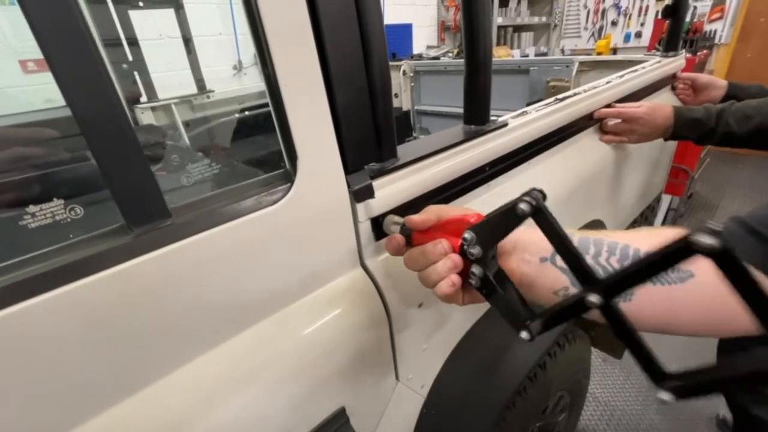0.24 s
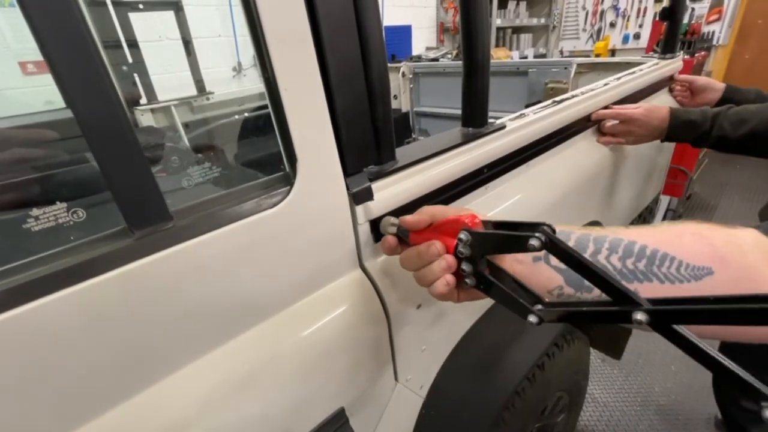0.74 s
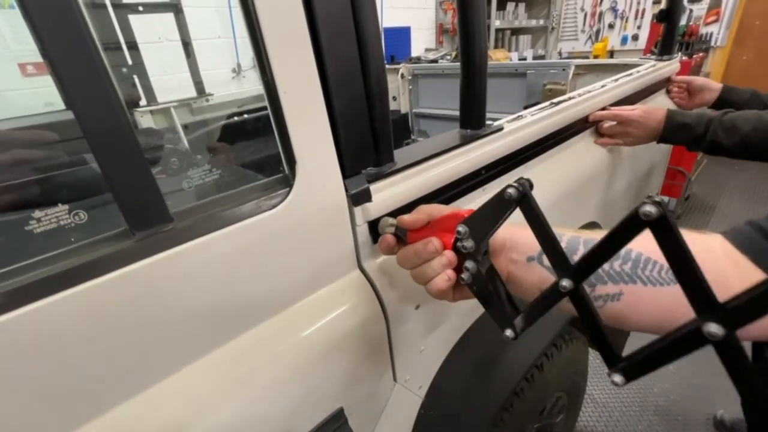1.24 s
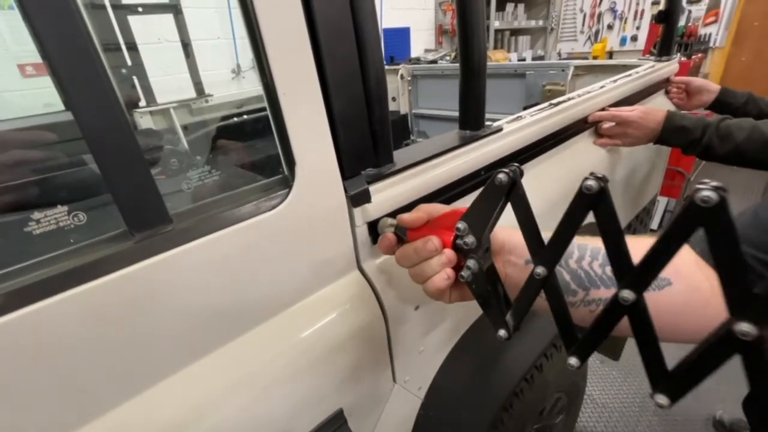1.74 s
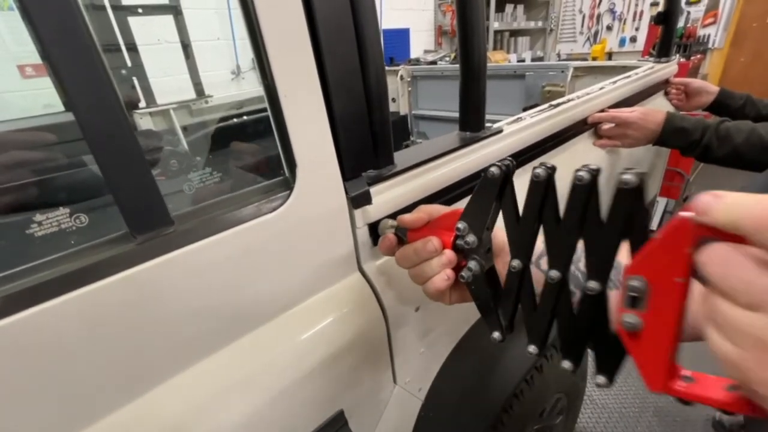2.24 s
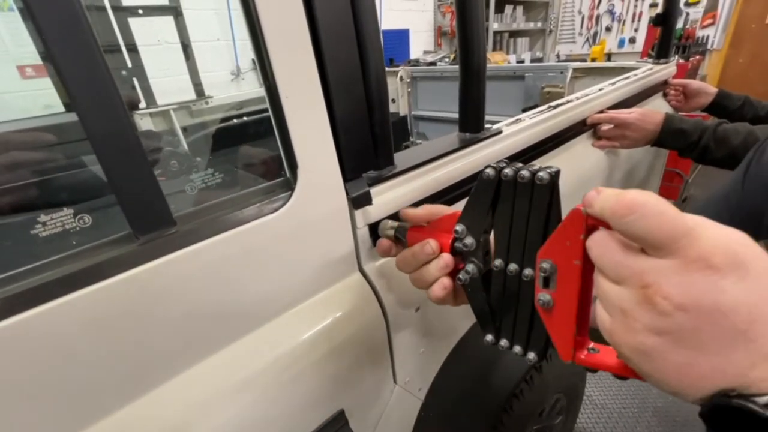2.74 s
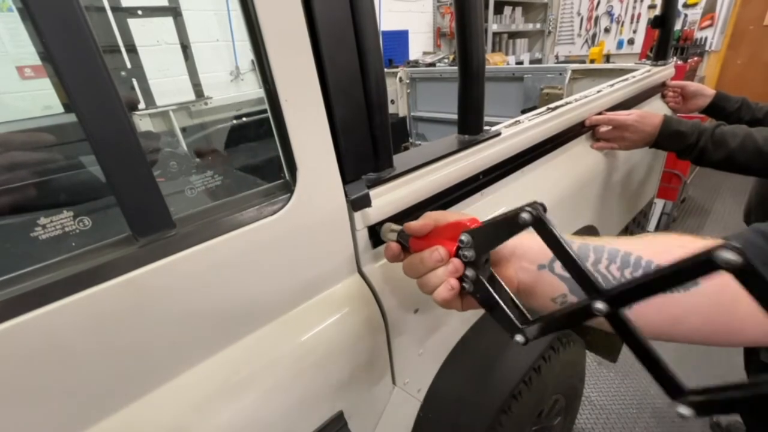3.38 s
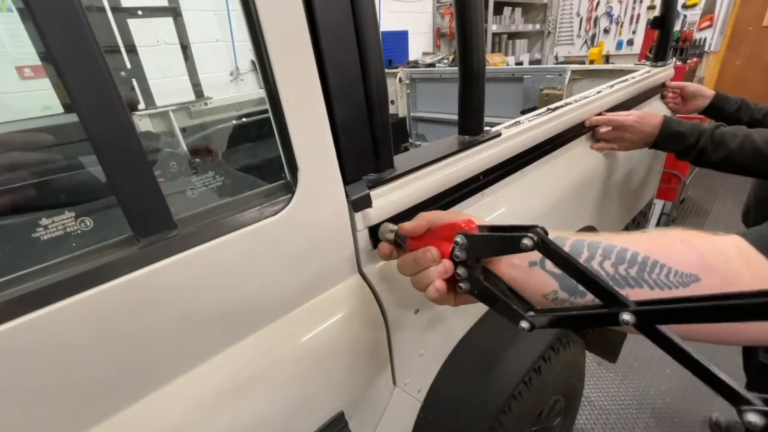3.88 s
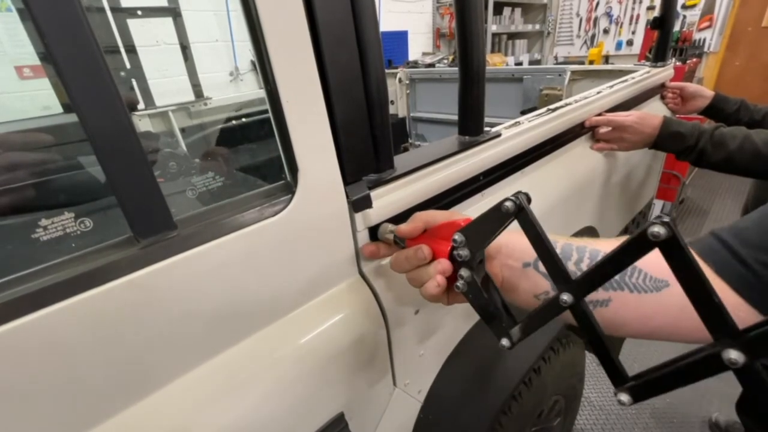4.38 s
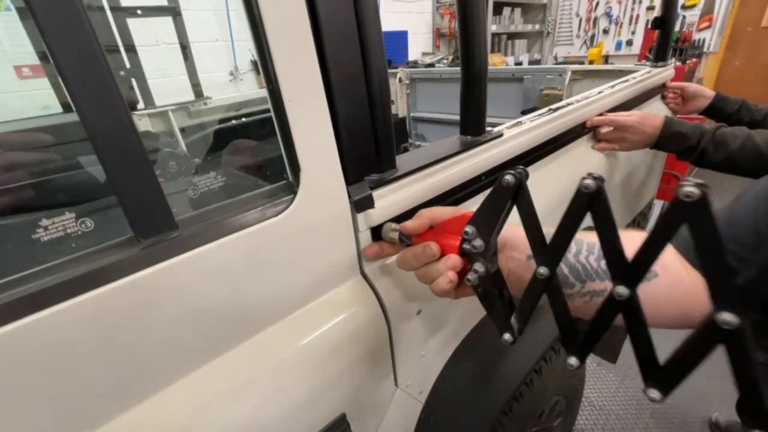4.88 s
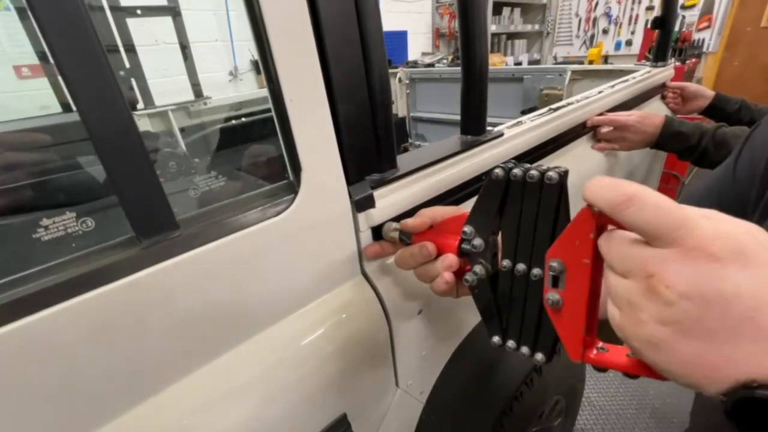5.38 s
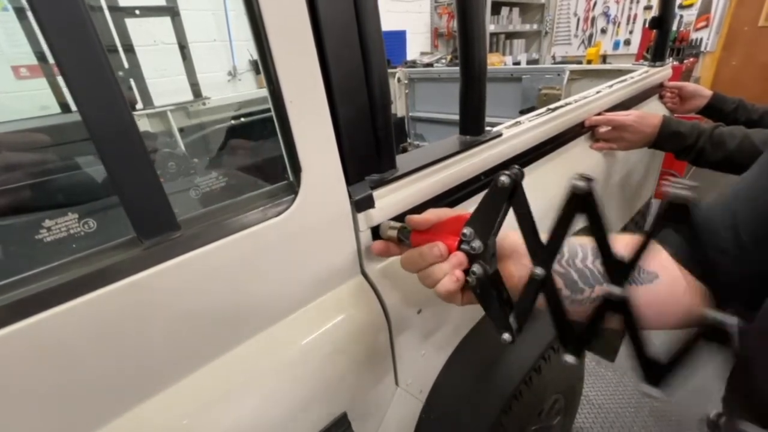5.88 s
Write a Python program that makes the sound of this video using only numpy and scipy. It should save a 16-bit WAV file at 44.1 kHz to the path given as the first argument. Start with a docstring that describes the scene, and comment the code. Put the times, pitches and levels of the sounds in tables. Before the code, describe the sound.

Loose metal arms clatter open and shut in a workshop, straining in short rasping judders against sheet metal before one sharp, booming snap.

```python
"""Lazy-tongs rivet gun on a van panel

A lazy-tongs rivet gun is pumped twice against a van's side panel in a workshop with ventilation.
Each push drags the rivet stem in jerks: trains of slips that shake the sheet and its damped modes.
The steel links clack as filtered noise bursts and ringing sines, rub with a grainy hiss, and rattle.
The stem snaps with a bang; a limiter ducks and climbs back steadily, so the room tail hangs on."""
import sys
import numpy as np
from scipy import signal
from scipy.fft import rfft, irfft
from scipy.io import wavfile
from scipy.ndimage import uniform_filter1d, minimum_filter1d

SR = 44100
rng = np.random.default_rng(int(sys.argv[2]) if len(sys.argv) > 2 else 0)


def generate_wav(signal):
    """Clip the signal to [-1, 1] and save it as 16-bit WAV at the path in sys.argv[1]."""
    frames = np.transpose(np.atleast_2d(signal))
    scaled = np.clip(frames, -1, 1) * 32767
    pcm = np.round(scaled).astype(np.int16)
    wavfile.write(sys.argv[1], SR, pcm)


N = 269884  # length of the scene in samples


def from_db(db):
    """Decibels to gain."""
    return 10 ** (np.asarray(db) / 20)


def unit(x):
    """Scale to unit energy per channel."""
    return x / np.sqrt(np.mean(np.sum(x ** 2, axis=-1)) + 1e-20)


def at_hz(points, hz, axis=1):
    """Read a column of a table on a log-frequency axis."""
    table = np.array(points, float)
    return np.interp(np.log(np.maximum(hz, 1)), np.log(table[:, 0]), table[:, axis])


def seconds(length):
    """A time axis."""
    return np.arange(int(length * SR)) / SR


def add(out, s, sound):
    """Mix a sound in at a given time."""
    start = max(int(s * SR), 0)
    part = sound[..., :N - start]
    out[..., start:start + part.shape[-1]] += part


def through(x, response):
    """Pass a signal through an impulse response."""
    return signal.fftconvolve(np.atleast_2d(x), np.atleast_2d(response), axes=-1)[:, :N]


def band_pass(order, low_hz, high_hz):
    """Filter sections that keep one band."""
    return signal.butter(order, [low_hz, high_hz], "band", fs=SR, output="sos")


def colour(points, size=8192):
    """Causal (minimum-phase) response of a spectrum, unit energy."""
    log_gain = np.log(from_db(at_hz(points, np.fft.rfftfreq(size, 1 / SR))))
    cepstrum = irfft(log_gain)
    # fold the cepstrum onto positive time, which makes the phase minimal
    cepstrum[1:size // 2] *= 2
    cepstrum[size // 2 + 1:] = 0
    return unit(irfft(np.exp(rfft(cepstrum))))


# left-right likeness of diffuse sound: pitch_hz [Hz], likeness [correlation, -1 to 1]
STEREO_LIKENESS = [(60,0.68),(130,.92),(250,.7),(500,0.3),(950,-0.29),(2500,-0.17),(10000,-0.067)]


def diffuse(size):
    """White stereo noise, alike in the bass and nearly unrelated or slightly opposed higher up."""
    mid, side = rfft(rng.standard_normal((2, size)))
    alike = np.clip(at_hz(STEREO_LIKENESS, np.fft.rfftfreq(size, 1 / SR)), -.99, .99)
    shared = np.sqrt((1 + alike) / 2) * mid
    opposed = np.sqrt((1 - alike) / 2) * side
    return irfft(shared + opposed * [[1], [-1]], size)


def burst(t60):
    """The dense, quickly dying vibration after one contact."""
    t = seconds(t60 + .005)
    return unit(diffuse(len(t)) * from_db(-60 * t / t60))


def modes(table, scatter_db, lead_ms):
    """Damped sines, struck with new strengths each time and reaching the left port first."""
    t = seconds(1)
    hz, db, t60 = np.transpose(table)[:, :, None]
    strength = from_db(db + scatter_db * rng.standard_normal(db.shape))
    decay = np.exp(-np.log(1000) * t / t60)
    polarity = (-1) ** np.arange(len(hz))[:, None]
    wave = np.sum(strength * decay * np.sin(2 * np.pi * hz * t) * polarity, axis=0)
    right = np.interp(t - lead_ms / 1000, t, wave, left=0)
    return unit(np.array([wave, right]))


def sharp(t60, spread):
    """A close crack, its rise softened over about 1 ms: alike at both ports, left two samples sooner."""
    crack = burst(t60)[0]
    direct = np.array([np.append(crack, [0, 0]), np.append([0, 0], crack)])
    rise = 1 - np.exp(-np.arange(len(crack)) / (SR * .0008))
    return unit((direct[:, :len(crack)] + spread * burst(t60)) * rise)


LOW_PASS_HZ = 9437


def dull(x):
    """Steep low-pass near 9.4 kHz for the rub, buzz, room and air."""
    return signal.sosfilt(signal.cheby1(10, .5, LOW_PASS_HZ, fs=SR, output="sos"), x)


# colour of the ventilation: pitch_hz [Hz], relative level_db [dB]
AIR_COLOUR = [(15, -36.5), (25, -15.5), (59, -1.5), (80, -10.5), (145, -7), (180, -15), (223, -12.5),
              (277, -21.5), (405, -18.5), (754, -29.5), (1130, -25.5), (5000, -40.5), (8830, -36.5),
              (16000, -66.5)]


def ventilation(level_db):
    """Steady air noise, coloured by its spectrum."""
    return from_db(level_db) * through(diffuse(N), colour(AIR_COLOUR))


# workshop tail: pitch_hz [Hz], t60_s [s], relative reflected level_db [dB]
ROOM_BANDS = [(60,0.92,-9),(200,0.47,-13.5),(486,0.43,-5.5),(1171,0.54,-8.5),(3100,0.69,-7),(6500,0.6,-11),(8740,0.5,-12),(10686,0.82,-1.5),(14000,.2,-25.5)]


def workshop(x, early_db, early_t60, late_db):
    """Quick reflections off the van and floor, then a diffuse tail that dies band by band."""
    t = seconds(1.3)
    white, tail = [diffuse(len(t)), diffuse(len(t))], 0
    edges = np.append(np.geomspace(40, 6500, 14), [8200, 10000, 12000, 16000])
    for k, (low, high) in enumerate(zip(edges, edges[1:])):
        band = signal.sosfilt(band_pass(4, low, high), white[k % 2])  # neighbours use separate noise
        hz = np.sqrt(low * high)
        late = unit(from_db(-60 * t / at_hz(ROOM_BANDS, hz)) * (1 - np.exp(-t / 0.0092)))
        early = unit(from_db(-60 * t / early_t60) * (t > .003))
        envelope = np.hypot(from_db(late_db) * late, from_db(early_db) * early)
        tail = tail + band * from_db(at_hz(ROOM_BANDS, hz, axis=2)) * envelope
    return through(x, tail)


# modes of the hollow van body: pitch_hz [Hz], relative level_db [dB], t60_s [s]
VAN_MODES = [(49.3,-5,0.59),(56.98,-4,1.2),(75,-0.5,0.72),(90.33,-7.5,0.87),(119.6,-3.5,0.59),(149,-5,0.69)]
# a clack shoves the van in step with its strength: dB per dB of steel and of tool body
BOOM_PER_STEEL, BOOM_PER_BODY = .45, 0.38


def van_boom(clack_db, jerk_db, snap_db, swell_s, rumble_db):
    """Every shove swells slowly into the low modes of the hollow van and the rumble of its panels."""
    shoves = []
    for s, crack_db, knock_db, _ in CLACK_EVENTS:
        shoves.append((s, BOOM_PER_STEEL * crack_db + BOOM_PER_BODY * knock_db + clack_db))
    shoves += [(s, db + jerk_db) for s, db, _ in JERK_EVENTS]
    shoves += [(SNAP_S, snap_db)]
    out, t = np.zeros((2, N)), seconds(1)
    bass = band_pass(2, 48, 130)
    for s, db in shoves:
        rumble = unit(signal.sosfilt(bass, diffuse(len(t))) * from_db(-60 * t / 0.72))
        boom = modes(VAN_MODES, scatter_db=5.0, lead_ms=.2) + from_db(rumble_db) * rumble
        add(out, s, from_db(db) * unit(boom * (1 - np.exp(-t / swell_s))))
    return out


# crack of the steel: pitch_hz [Hz], relative level_db [dB]
STEEL_COLOUR = [(300,-37.5),(1300,-12.5),(2100,-8),(3000,-10),(4300,-7),(5400,-4.5),(6600,-4.5),(7800,-6.5),(9400,-5),(10700,-5.5),(12200,-3.5),(13500,-36),(15500,-36),(17000,-50.5)]
# ring of the steel links: pitch_hz [Hz], relative level_db [dB], t60_s [s]
LINK_MODES = [(2080,-3.5,.12),(2250,-5,0.25),(3852,1,0.03),(5890,-6,0.1),(6070,-12.5,.1)]


def steel(contacts, ring_db):
    """Contacts on the tongs: a bright crack and a faint ring of the links."""
    crack = through(contacts, colour(STEEL_COLOUR))
    ring = through(contacts, modes(LINK_MODES, scatter_db=-1.5, lead_ms=0.13))
    return crack + from_db(ring_db) * ring


# colour of the tool's cast body: pitch_hz [Hz], relative level_db [dB]
TOOL_COLOUR = [(60,-15),(150,-1.5),(300,2.5),(450,-5),(750,-5.5),(1020,-6),(1200,-13),(1550,-12.5),(2300,-9.5),(6000,-24.5)]


def tool_body(x):
    """The cast body colours whatever shakes it."""
    return through(x, colour(TOOL_COLOUR))


def buzz(jerk_db, snap_db, t60):
    """Each jolt leaves the loose links buzzing: decaying noise in the colour of the steel."""
    out = np.zeros((2, N))
    jolts = [(s, db + jerk_db) for s, db, _ in JERK_EVENTS] + [(SNAP_S, snap_db)]
    for s, db in jolts:
        add(out, s, from_db(db) * burst(t60))
    return dull(through(out, colour(STEEL_COLOUR)))


# a stroke swells, eases off while it lasts, then dies away
STROKE_ATTACK_S, STROKE_SAG_DB_PER_S, STROKE_RELEASE_DB_PER_S = 0.021, 8, 75


def stroke(start, length):
    """Gain of one slide of the tongs over time: attack, slow sag, release."""
    t = np.maximum(np.arange(N) / SR - start, 0)
    fall_db = STROKE_SAG_DB_PER_S * t + STROKE_RELEASE_DB_PER_S * np.maximum(t - length, 0)
    return (1 - np.exp(-t / STROKE_ATTACK_S)) * from_db(-np.minimum(fall_db, 100))


# the tongs slide open or shut: start_s [s], length_s [s], relative hiss_db [dB], low groan_db [dB]
STROKE_EVENTS = [(0, 0.08, -56.5, -45), (.9, 0.67, -72, -66.5), (2.879, .32, -68, -56.5),
                 (3.799, 0.27, -72.5, -55), (5.061, .13, -72, -65.5), (5.71, .41, -67.5, -51.5)]


def rub(hiss_db, groan_db, grain_db):
    """Dry pivots slide with an uneven grain: a hiss from the steel, a groan from the tool's body."""
    hiss = sum(from_db(db + hiss_db) * stroke(s, length) for s, length, db, _ in STROKE_EVENTS)
    groan = sum(from_db(db + groan_db) * stroke(s, length) for s, length, _, db in STROKE_EVENTS)
    t = np.arange(N) / SR
    steps = np.arange(0, N / SR, .004)
    grain = np.interp(t, steps, rng.standard_normal(len(steps)))
    friction = dull(diffuse(N)) * from_db(grain_db * grain)
    return steel(friction * hiss, ring_db=-6.0) + tool_body(friction * groan)


# rattle levels: offsets over the stroke's hiss and groan, and random spread either way
RATTLE_STEEL_DB, RATTLE_BODY_DB, RATTLE_SPREAD_DB = 17, -1.5, 4.5
RATTLES_PER_S, RATTLE_TOP_HZ = 11, 1500  # mean rate, top of the knock


def rattles():
    """Light random contacts of the loose pivots during each stroke, as rows like those of the clacks."""
    rows = []
    for start, length, hiss_db, groan_db in STROKE_EVENTS:
        draws = rng.random((24, 2))
        times = np.cumsum(.4 + 1.2 * draws[:, 0]) / RATTLES_PER_S
        levels_db = RATTLE_SPREAD_DB * (2 * draws[:, 1] - 1) - STROKE_SAG_DB_PER_S * times
        for after, db in zip(times, levels_db):
            if after < length:
                crack_db = hiss_db + RATTLE_STEEL_DB + db
                knock_db = groan_db + RATTLE_BODY_DB + db
                rows.append((start + after, crack_db, knock_db, RATTLE_TOP_HZ))
    return rows


# handle knocks as the slack is taken up: start_s [s], relative level_db [dB]
KNOCK_EVENTS = [(0.064,-46),(5.618,-45),(5.702,-27),(5.707,-20),(5.933,-39)]
# dull colour of the handle: pitch_hz [Hz], relative level_db [dB]
HANDLE_COLOUR = [(80,-11),(200,7.5),(400,-6),(720,-0.5),(1300,-3.5),(1700,-3.5),(2300,-4.5),(3500,-14.5),(6000,-24),(10000,-29),(14000,-60)]


def handle(knock_db, ring_db):
    """A dull knock at the handle, with the links singing on."""
    contacts = np.zeros((2, N))
    for s, db in KNOCK_EVENTS:
        add(contacts, s, from_db(db + knock_db) * burst(t60=0.029))
    ring = through(contacts, modes(LINK_MODES[:2], scatter_db=-0.5, lead_ms=0.067))
    return through(contacts, colour(HANDLE_COLOUR)) + from_db(ring_db) * ring


# short, bright ping of a pivot pin: pitch_hz [Hz], relative level_db [dB], t60_s [s]
PIN_MODES = [(3430,-4.5,0.0056),(5570,-14.5,0.033),(7370,-1.5,0.0049),(9070,6.5,0.017),(9240,-9,0.0095),(11200,-1.5,0.029)]


def pings(ping_db):
    """The struck pin rings for a few milliseconds, right next to the microphone."""
    out = np.zeros((2, N))
    for s, crack_db, *_ in CLACK_EVENTS:
        add(out, s, from_db(crack_db + ping_db) * modes(PIN_MODES, scatter_db=2.0, lead_ms=0.039))
    return out


# the links hit their stops or each other; the first row, at 0.085 s, is a dull knock at the handle: # start_s
# [s], relative steel_db [dB], relative body_db [dB], top of the knock top_hz [Hz]
CLACK_EVENTS = [(.085, -54.5, -37.5, 593), (.197, -47, -63, 1500), (.301, -27.5, -47, 1470),
                (0.7109, -39.5, -50, 2350), (.7566, -26.5, -48, 2010), (.83, -17.5, -39, 1853),
                (1.835, -60.5, -64.5, 1500), (2.351, -17, -35, 1147), (2.4455, -17, -29.5, 960),
                (2.5677, -7, -21, 1660), (2.894, -43.5, -47, 1190), (2.97, -46.5, -49.5, 1210),
                (3.064, -40, -44.5, 1420), (3.107, -33, -48, 2050), (3.159, -30, -54, 2500),
                (3.996, -18, -33.5, 2317), (4.34, -52.5, -74, 2010), (5.1955, -17.5, -42.5, 1110),
                (5.22, -15, -39.5, 1092), (5.2382, -9.5, -32.5, 1910), (5.929, -38.5, -49.5, 1900),
                (6.046, -42, -67, 2000)]
KNOCK_LOW_HZ = 380  # the small head radiates little below this


def clacks(steel_db, body_db, ring_db, arm_db):
    """Link on link: steel cracks, the cast head knocks, and the arms ring on just under the knock's top."""
    contacts, knocks = np.zeros((2, 2, N))
    for s, crack_db, knock_db, top_hz in list(CLACK_EVENTS) + rattles():
        add(contacts, s - .0005, from_db(crack_db + steel_db) * sharp(t60=0.013, spread=1.0))
        low_pass = signal.butter(4, top_hz, fs=SR, output="sos")
        knock = signal.sosfilt(low_pass, burst(t60=0.12))
        arms = signal.sosfilt(band_pass(3, 0.6 * top_hz, 0.83 * top_hz), burst(t60=0.24))
        add(knocks, s + .0035, from_db(knock_db + body_db) * knock)
        add(knocks, s + .0035, from_db(knock_db + body_db + arm_db) * arms)
    knocks = signal.sosfilt(signal.butter(1, KNOCK_LOW_HZ, "high", fs=SR, output="sos"), knocks)
    return steel(contacts, ring_db) + tool_body(knocks)


# modes of the van's side panel: pitch_hz [Hz], relative level_db [dB], t60_s [s]
PANEL_MODES = [(162.2,-15,0.98),(239.7,-10.5,0.86),(269.5,-6,0.36),(354,-13,.1),(403.5,-13,0.24),(426,-12.5,0.13),(490,-10,0.085),(557,-5.5,0.35),(602,-6.5,0.17),(701,0,.09),(855,-4.5,0.023),(939,10.5,0.044),(990,-6.5,0.21),(994,-7.5,.1),(1306,-8,0.25),(1392,-6,.07),(1597,-19,0.38),(2170,-13.5,0.065)]


def panel():
    """One blow's ring of the side panel."""
    return modes(PANEL_MODES, scatter_db=1.5, lead_ms=.25)


# the stem jerks through the rivet, harder as each push goes on:
# start_s [s], relative level_db [dB], fading time of the judder length_s [s]
JERK_EVENTS = [(.296, -37.5, 0.019), (.324, -32, 0.013), (.359, -19.5, 0.017), (.367, -16, 0.019),
               (.403, -7.5, 0.008), (3.354, -34.5, .008), (3.375, -26.5, .014), (3.423, -18, .017),
               (3.436, -12, .014), (3.453, -9, .028), (3.476, -7, .006)]
# colour of the shaken sheet metal: pitch_hz [Hz], relative level_db [dB]
SHEET_COLOUR = [(50,-30.5),(150,-10),(270,0.5),(550,-7.5),(760,-10),(950,-4),(1150,-10.5),(2200,-16),(4000,-22),(10000,-44.5),(14000,-73.5)]
JERK_BITE = 1.315  # harder jerks are brighter: dB of steel per dB of jerk


def jerks(steel_db, sheet_db, modes_db, slips_per_s, ring_db):
    """Each jerk is a run of uneven slips of the stem that set the sheet metal ringing."""
    contacts, sheet, ringing = np.zeros((3, 2, N))
    for s, panel_db, length in JERK_EVENTS:
        t = seconds(2 * length)
        slips = (rng.random(len(t)) < slips_per_s / SR) * rng.standard_normal(len(t))
        slips[0] = 2  # the stem always lets go at the start
        slips = unit(slips * np.exp(-t / length))
        crack = unit(through(slips, sharp(t60=.012, spread=0.67)))
        add(contacts, s, from_db(JERK_BITE * panel_db + steel_db) * crack)
        add(sheet, s, from_db(panel_db + sheet_db) * unit(through(slips, burst(t60=0.082))))
        add(ringing, s, from_db(panel_db + modes_db) * unit(through(slips, panel())))
    return steel(contacts, ring_db) + through(sheet, colour(SHEET_COLOUR)) + ringing


# the stem sticks and slips almost evenly: slips per second and their unevenness (share of a period)
SQUEAL_HZ, SQUEAL_JITTER = 937.5, .12
SQUEAL_BITE = 1.7  # dB of squeal per dB of jerk, so hard jerks squeal most


def squeal(squeal_db, swell_s):
    """Under load the slips fall into step and make the rivet squeal for a moment."""
    slips = np.zeros(N)
    for s, db, length in JERK_EVENTS:
        after = np.cumsum(1 + SQUEAL_JITTER * rng.standard_normal(60)) / SQUEAL_HZ
        sizes = unit((1 - np.exp(-after / swell_s)) * np.exp(-(after / length) ** 2))
        slips[((s + after) * SR).astype(int)] += from_db(SQUEAL_BITE * db + squeal_db) * sizes
    return signal.sosfilt(band_pass(2, 600, 1250), slips + 1e-18) * np.ones((2, 1))


# colour of the bang: pitch_hz [Hz], relative level_db [dB]
SNAP_COLOUR = [(40,-66.5),(100,-2),(250,-8),(450,-12.5),(700,-5.5),(980,-1),(1700,0.5),(2800,-3.5),(4500,-5),(5700,2),(7000,-1),(9600,-5),(11500,-11.5),(14000,-65.5)]
# ring of the breaking stem: pitch_hz [Hz], relative level_db [dB], t60_s [s]
STEM_MODES = [(3540,-12.5,0.005),(5660,0.5,0.0086),(8740,-0.5,0.0099)]
# the panel's single damped flex: pitch_hz [Hz], relative level_db [dB], t60_s [s]
FLEX_MODES = [(165,-3,0.1),(276,3,0.039),(514,5,0.01),(936,3.5,0.02)]
SNAP_S, SNAP_DB = 4.546, 10.5  # the stem breaks: time (s) and gain over all its parts (dB)


def snap(tear_db, stem_db, recoil_db, panel_db):
    """The stem tears with a swelling rasp and breaks; the freed tool recoils and the panel springs back."""
    contacts, ringing = np.zeros((2, 2, N))
    tear = burst(t60=0.019)[:, ::-1]  # a reversed decay swells up to the break
    add(contacts, SNAP_S - tear.shape[1] / SR, from_db(tear_db) * tear)
    stem = modes(STEM_MODES, scatter_db=0.0, lead_ms=0.028) * from_db([[2], [-2]])  # louder on the left
    add(ringing, SNAP_S - .001, from_db(stem_db) * stem)
    add(contacts, SNAP_S + .001, from_db(recoil_db) * burst(t60=.045))
    add(ringing, SNAP_S + 0.00296, from_db(panel_db) * panel())
    flex = modes(FLEX_MODES, scatter_db=0, lead_ms=.05)
    add(ringing, SNAP_S + .003, from_db(recoil_db - 3) * flex)
    return from_db(SNAP_DB) * (through(contacts, colour(SNAP_COLOUR)) + ringing)


def scene():
    """Tool and panel close by, the van's boom, the workshop and its ventilation."""
    close = clacks(steel_db=12.0, body_db=31.5, ring_db=-26.5, arm_db=-1.0)
    close = close + handle(knock_db=18.5, ring_db=-14.0)
    close = close + jerks(steel_db=17.5, sheet_db=20.5, modes_db=20.5, slips_per_s=810, ring_db=-24.5)
    close = close + snap(tear_db=1.5, stem_db=16.5, recoil_db=21.5, panel_db=3.5)
    close = close + rub(hiss_db=-3.0, groan_db=-5.0, grain_db=5.5)
    close = close + buzz(jerk_db=6.0, snap_db=14.5, t60=.35)
    direct = pings(ping_db=13.0) + squeal(squeal_db=29.0, swell_s=.003)  # heard without the room
    boom = van_boom(clack_db=15.0, jerk_db=9.5, snap_db=9.5, swell_s=0.056, rumble_db=-1.5)
    air = ventilation(level_db=-62.0)
    room = workshop(close, early_db=1.0, early_t60=0.19, late_db=-3.5)
    return close + direct + dull(room + air) + boom


def limiter(x, ceiling_db, hold_s, release_db_per_s):
    """The gain drops just ahead of a peak, is held, then climbs back steadily."""
    t = np.arange(N) / SR
    over = np.maximum(20 * np.log10(np.abs(x).max(axis=0) + 1e-9) - ceiling_db, 0)
    hold, ahead = int(hold_s * SR) | 1, int(.003 * SR)
    held = -minimum_filter1d(-over, hold, origin=hold // 2)
    cut = np.maximum.accumulate(held + release_db_per_s * t) - release_db_per_s * t
    early_cut = -minimum_filter1d(-cut, 2 * ahead)
    return x * from_db(-uniform_filter1d(early_cut, 2 * ahead))


CUTOFF_HZ = 17500  # start of the stop band


def record(dry):
    """Limiter, then the top is cut."""
    limited = limiter(dry, ceiling_db=-1.3, hold_s=0.035, release_db_per_s=75.0)
    return signal.sosfilt(signal.cheby2(12, 70, CUTOFF_HZ, fs=SR, output="sos"), limited)


dry = scene()
out = record(dry)
generate_wav(out)
```